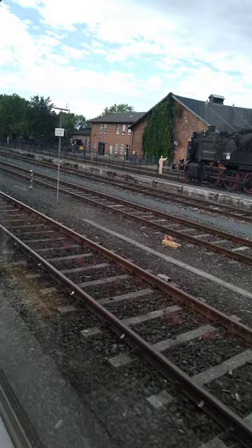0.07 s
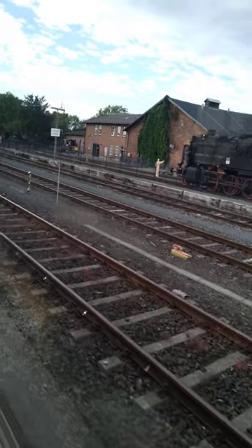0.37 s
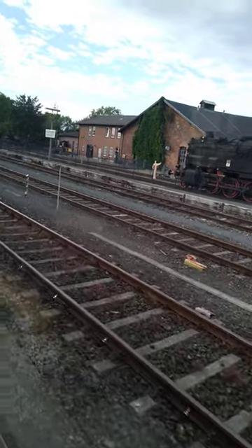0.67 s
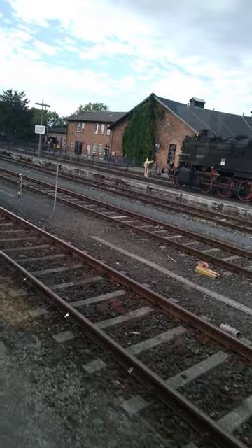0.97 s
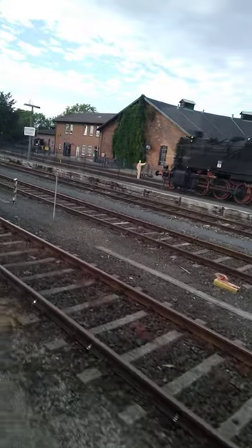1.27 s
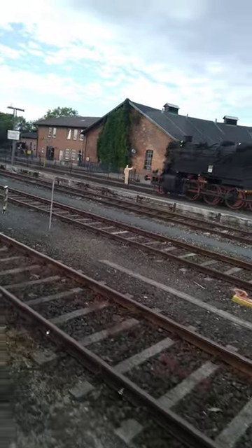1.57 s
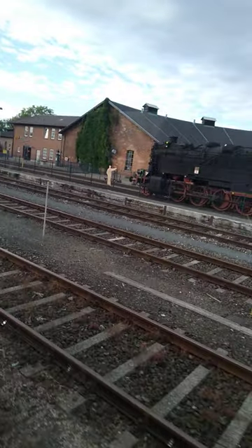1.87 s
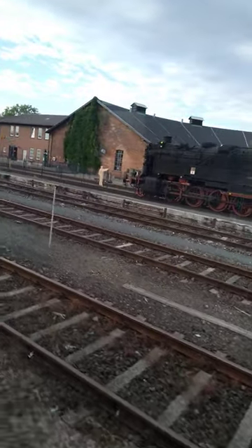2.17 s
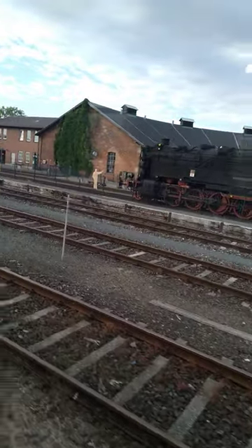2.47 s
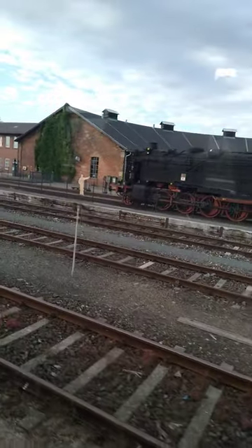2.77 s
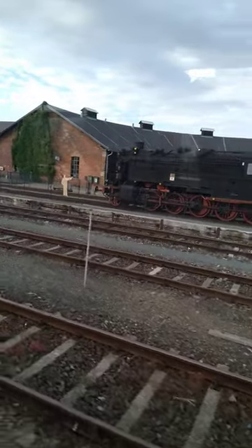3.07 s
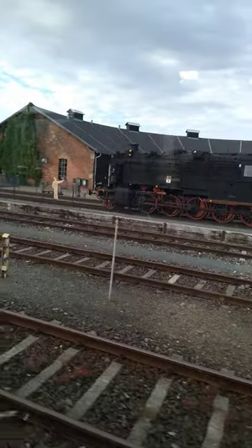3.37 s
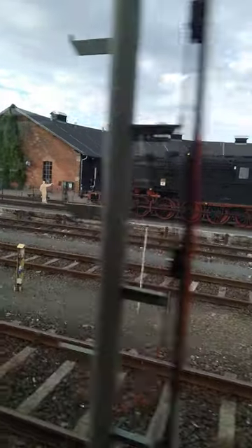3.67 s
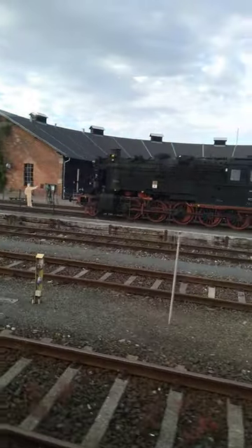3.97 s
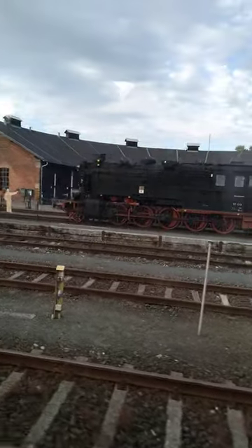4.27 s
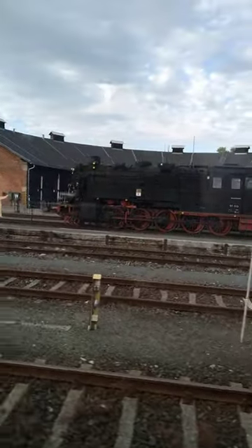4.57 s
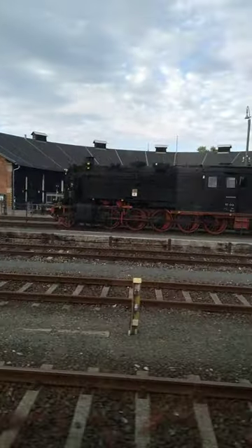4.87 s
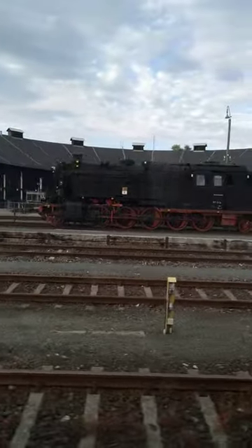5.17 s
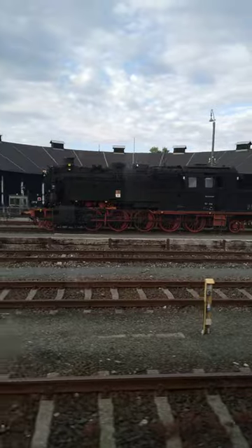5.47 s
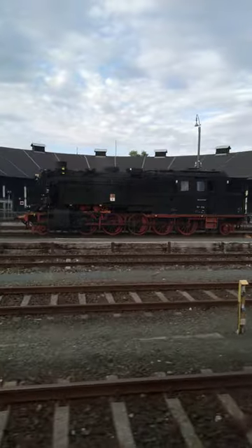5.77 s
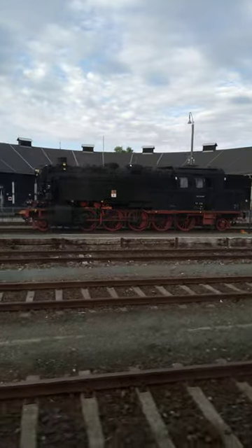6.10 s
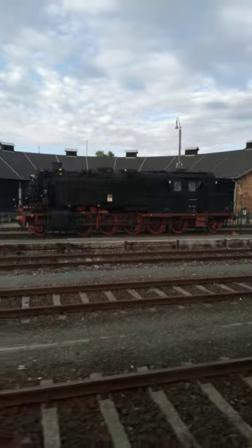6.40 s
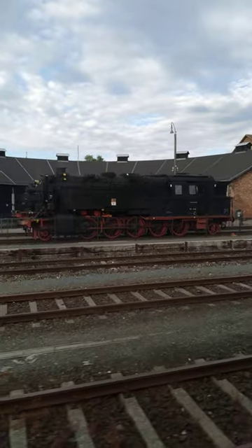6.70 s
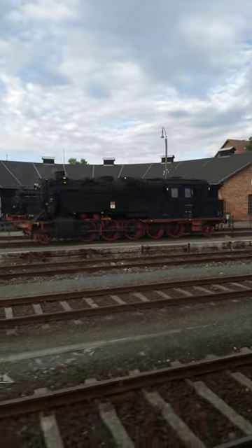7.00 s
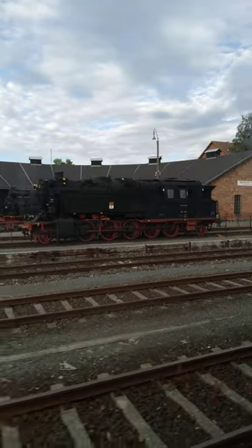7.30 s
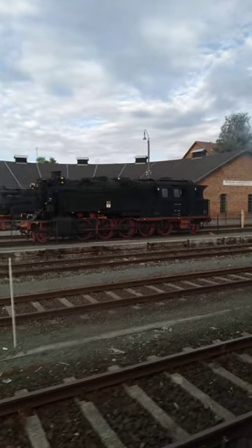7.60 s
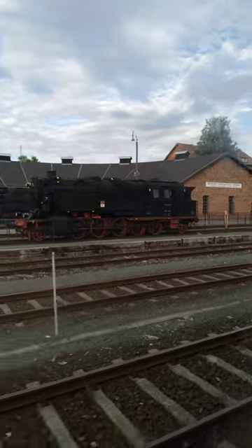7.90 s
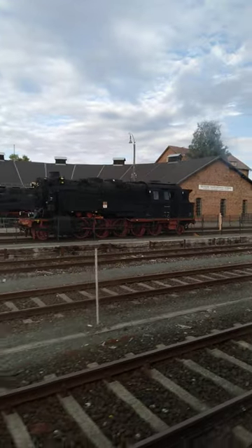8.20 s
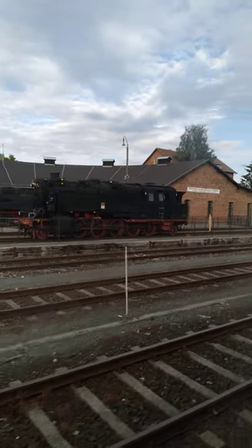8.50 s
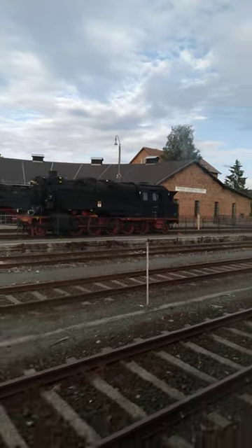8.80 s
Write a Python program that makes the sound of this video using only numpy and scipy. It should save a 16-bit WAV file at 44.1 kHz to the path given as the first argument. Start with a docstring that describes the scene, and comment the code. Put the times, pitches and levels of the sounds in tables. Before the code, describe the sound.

Inside a rolling train, wheels rumble under a diesel engine's drone, with gusts of window air and two sharp microphone bumps.

```python
"""A six-cylinder diesel drones through the cabin of a railcar rolling through a yard, heard from inside.
It drops in a gear change with a puff of air, then pulls again, while the wheels rumble and roar.
On the right a draught hisses in gusts at a window gap. Closest of all is the hand on the microphone,
which bumps it twice and clicks on its grip.
The sound opens from silence with a faint crackle and a short fade."""
import sys
import numpy as np
from scipy.fft import rfft, irfft, next_fast_len
from scipy.io import wavfile
from scipy.ndimage import map_coordinates

SR = 44100
rng = np.random.default_rng(int(sys.argv[2]) if len(sys.argv) > 2 else 0)


def int16_out(signal):
    """Quantize to a 16-bit WAV file."""
    q = np.round(np.clip(np.atleast_2d(signal).T, -1, 1) * 32767)
    wavfile.write(sys.argv[1], SR, q.astype(np.int16))


N = 390285


def engine(firing, cycle, firing_hz, shift_s=1.57, engage_s=2.0, shift_len_s=0.42,
           waver_db=1.9, swell_db=1.45, flicker_db=0.65, drift_rad=0.24):
    """Six firings a cycle; the cabin swells four orders as the speed takes them through its resonances."""
    boom = [(0.9, -48), (1.15, -35), (1.62, -25.5), (1.88, -47), (2.15, -26.5), (2.75, -26), (3.5, -24),
            (5.4, -28.5), (5.95, -25), (6.3, -33.5), (6.9, -25), (7.55, -34), (8.25, -24.5), (8.85, -26)]  # tone at the firing rate: t/s, level/dB
    orders = [2, 2.5, 3, 6]  # tones the cabin lifts: multiples of the firing rate
    order_levels = [(-40.5, -45.5), (-39, -49), (-48.5, -42.5), (-63.5, -55.5)]  # each, off resonance: low-gear level/dB, high-gear level/dB
    surges = [(0.62, 0.23, 7), (1.49, 0.34, 8), (1.83, .2, 6.5), (2.55, 0.26, 12.5), (7.15, 0.63, 3)]  # the second order under a changing load: t/s, length/s, lift/dB
    # hums at four and seven times the firing rate: t/s, level/dB
    low_hum = [(1.0, -49), (1.7, -58), (2.3, -47.5), (4.05, -43), (4.5, -31.5), (5.4, -42), (5.65, -38.5),
               (6.5, -34), (6.9, -40.5), (8.0, -37), (8.85, -42)]
    high_hum = [(2.0, -64), (2.301, -47), (3.3, -44), (4.4, -39.5), (5.1, -42), (5.4, -53.5), (5.65, -41),
                (6.3, -40.5), (6.95, -34.5), (7.55, -49), (8.85, -45.5)]
    # further engine tones: multiple of the cycle rate, level/dB
    low_gear = [(3, -31), (10, -39), (26, -39), (28, -39), (50, -69)]
    high_gear = [(4, -50), (21, -49.5), (33, -56), (39, -53), (45, -53.5), (51, -54.5), (66, -65),
                 (72, -62.5)]
    t = np.arange(N) / SR
    drone = amp(curves(boom)[0] + flicker_db * wobble(9.7)) * np.sin(firing)
    engaged = np.clip((t - engage_s) / shift_len_s + .5, 0, 1)
    surge_db = sum(db * swell(s, length_s, 2) for s, length_s, db in surges)
    for k, (low_db, high_db) in zip(orders, order_levels):
        db = low_db + engaged * (high_db - low_db) + cabin_db(k * firing_hz) + (k == 2) * surge_db
        level = amp(db + swell_db * wobble(4) + flicker_db * wobble(14))
        drone += level * np.sin(k * firing + rng.uniform(0, 2 * np.pi))
    for k, hum in (4, low_hum), (7, high_hum):
        level = amp(curves(hum)[0] + flicker_db * wobble(14))
        drone += level * np.sin(k * firing + rng.uniform(0, 2 * np.pi))
    shifted = np.clip((t - shift_s) / shift_len_s / 2 + .5, 0, 1)
    for lines, share in (low_gear, 1 - shifted), (high_gear, shifted):
        for k, db in lines:
            phase = k * cycle + drift_rad * wobble(7) + rng.uniform(0, 2 * np.pi)
            drone += share * amp(db + waver_db * wobble(3)) * np.sin(phase)
    return drone * amp([[.3], [-.3]])


def cabin_db(hz):
    """How much the cabin's standing waves lift a tone at the microphone."""
    standing_waves = [(91.46, 3, 9), (111.5, 8, 10.5), (127.7, 4, 6), (131.7, 1.5, 7), (139.3, 3, 6),
                      (262.5, 4.5, 15.5)]  # f/Hz, width/Hz, lift/dB
    return sum(db / (1 + (2 * (hz - centre) / width) ** 2) for centre, width, db in standing_waves)


def clatter(cycle, firing_hz, slowest_db=-54, db_per_decade=50, looseness=.5, size=1024):
    """The engine block rings with a pattern that repeats every crank turn, louder at high revs."""
    block_modes = [(279, 51, 13.5), (555.6, 50, 5), (782, 97, 1.5), (1022, 144, -0.5), (1278, 66, -2.5),
                   (2078, 49, -5.5), (2800, 39, -19)]  # f/Hz, width/Hz, level/dB
    crank = cycle / np.pi % 1 * size  # two turns a cycle
    pattern = np.array([np.interp(crank, np.arange(size), row) for row in rng.standard_normal((2, size))])
    shake = pattern + looseness * rng.standard_normal((2, N))
    ring = filtered(shake, lambda f: resonances(block_modes, f) / (1 + (f / 2500) ** 6))
    return amp(slowest_db + db_per_decade * np.log10(firing_hz / firing_hz.min())) * unit(ring)


def growl(firing, throb=0.34):
    """Loose gears chatter in their casing in step with the firings, at high revs and on load changes."""
    levels = [(0.5, -41.5), (1.3, -46), (1.6, -49), (1.88, -42), (2.05, -54), (2.3, -61), (5.05, -61.5),
              (5.28, -39.5), (5.5, -49), (5.8, -55)]  # t/s, level/dB
    casing_modes = [(246, 53, -6), (293, 56, 0.5), (325, 20, 0.5), (374.5, 12, -13.5), (553, 22, -16.5)]  # f/Hz, width/Hz, level/dB

    def casing(f):
        low_cut = 1 - np.exp(-(f / 200) ** 4)
        return resonances(casing_modes, f) / (1 + (f / 600) ** 4) * low_cut

    chatter = (1 + throb * np.cos(firing)) * rng.standard_normal(N)
    return amp(curves(levels)[0]) * unit(filtered(chatter, casing))


def wheels(firing, throb=0.11, roar_db=-53, rumble_sway_db=0.76, roar_sway_db=1.1):
    """The floor rumbles underfoot, throbbing with the firings; steel on rail roars above it in pitch."""
    floor = [(0.5, -37), (1.1, -33), (1.5, -33), (3.4, -33), (4.5, -33), (8.85, -33)]  # the rumble builds, then holds: t/s, level/dB
    rough_patch = (5.1, 0.32, 2.7)  # a stretch of rough track: t/s, length/s, lift/dB
    # spectra of floor and rail: f/Hz, level/dB
    rumble_spectrum = [(10, -21.5), (28, 3.5), (55, 6.5), (80, 3), (115, 1.5), (155, -4.5), (220, -5),
                       (290, -8), (350, -10), (430, -24), (600, -27.5), (1200, -75.5)]
    roar_spectrum = [(150, -16), (400, -3.5), (520, -2), (680, -6), (830, -4.5), (1000, -16), (1450, -13),
                     (2000, -30), (2800, -34.5), (6000, -59.5), (12000, -76.5)]
    roar_balance = [(300, -7), (600, -7), (1000, 1), (2500, -4.5)]  # mostly to the right: f/Hz, left minus right/dB
    s, length_s, lift_db = rough_patch
    rough_db = lift_db * swell(s, length_s, 2.3)
    rumble_level = amp(curves(floor)[0] + rough_db + rumble_sway_db * wobble(16))
    rumble = rumble_level * noise(rumble_spectrum, balance=[(100, 0.88)])
    roar_level = amp(roar_db + rough_db + roar_sway_db * wobble(30) + 0.3 * wobble(4.9))
    roar = roar_level * walls(noise(roar_spectrum, roar_balance))
    return (1 + throb * np.cos(firing)) * rumble + roar


def draught(flutter_db=0.92, sway_db=0.3, dropout_db=-19, faint_below_db=-64, choppy_db=5):
    """Air rushes past the right window and hisses in its gap in gusts; when faint, it sounds choppy."""
    levels = [(0.5, -65, -81), (0.75, -63.5, -78), (0.92, -64.5, -80), (1.2, -60, -71.5), (2.1, -63, -69.5),
              (2.95, -63.5, -73.5), (3.65, -63, -71.5), (4.0, -65, -78.5), (4.6, -62, -72),
              (5.3, -63.5, -75.5), (5.8, -63.5, -75), (6.9, -73, -91), (7.5, -68.5, -84.5),
              (8.3, -64.5, -82.5), (8.85, -63, -81.5)]  # under the gusts: t/s, rush level/dB, hiss level/dB
    gusts = [(0.595, 0.048, 2, 1), (1.605, .27, 10, 7.5), (1.801, 0.12, 0.5, 6.5), (2.72, .12, 2.5, 4),
             (3.162, 0.26, 6.5, 8.5), (3.516, 0.31, 6, 12.5), (4.475, 0.12, 3.5, 7.5), (4.686, .1, 0.5, 4),
             (5.635, 0.12, 2.5, 6), (5.866, 0.036, 4.5, 8.5), (6.335, 0.3, 2, 4), (6.603, 0.086, 6.5, 10),
             (7.19, 0.11, 6.5, 9.5), (7.9, 0.19, 3.5, 7.5), (8.4, 0.066, 1.5, 10.5)]  # t/s, length/s, rush lift/dB, hiss lift/dB
    dropouts = [(3.864, 0.044), (4.088, 0.026), (4.227, 0.14), (5.947, .025), (6.01, 0.09), (6.236, 0.018),
                (6.448, 0.022), (6.512, .035), (6.798, .035), (6.958, .03), (7.103, 0.015), (7.294, 0.1),
                (7.441, 0.098), (7.57, 0.065), (8.022, 0.032), (8.171, 0.028)]  # rush and hiss cut out briefly: t/s, length/s
    # spectra of the passing air and the gap: f/Hz, level/dB
    rush_spectrum = [(500, -12), (1100, 8), (1600, 7), (2100, 5.5), (2800, 2.5), (3600, -2), (4800, -9),
                     (6500, -20), (10000, -41.5), (15000, -60)]
    hiss_spectrum = [(2000, -27), (4000, 4), (5500, 0), (7000, -3.5), (8500, -5.5), (9400, -3),
                     (10100, -2.5), (10800, -10), (12000, -18.5), (15500, -28.5)]
    window_balance = [(1000, 0.5), (2300, -7), (4400, -11), (7000, -15.5), (10000, -25.5), (15000, -26.5)]  # f/Hz, left minus right/dB
    rush_db, hiss_db = curves(levels)
    for s, length_s, rush_lift_db, hiss_lift_db in gusts:
        gust = swell(s, length_s, edge=3.7)
        rush_db += rush_lift_db * gust
        hiss_db += hiss_lift_db * gust
    faint = np.clip((faint_below_db - rush_db) / 8, 0, 1)
    cut_out = np.max([swell(s, length_s, edge=2.5) for s, length_s in dropouts], axis=0)
    unsteady_db = dropout_db * cut_out + sway_db * wobble(14) + flutter_db * wobble(60)
    unsteady_db += choppy_db * faint * np.tanh(4 * wobble(36))
    rush = amp(rush_db + unsteady_db) * walls(noise(rush_spectrum, window_balance))
    hiss = amp(hiss_db + unsteady_db + 0.45 * wobble(120)) * walls(noise(hiss_spectrum, window_balance))
    return rush + hiss


def bumps(t60=0.048, rise_s=.00033, size=4096):
    """A finger strikes the microphone's left port: a steep push of air and a damped rebound."""
    strikes = [(4.973, -11, 124.3), (5.023, -8.5, 139.1)]  # t/s, level/dB, f/Hz
    out = np.zeros((2, N))
    t = np.arange(size) / SR
    attack = 1 - np.exp(-(t / rise_s) ** 2)
    for s, db, hz in strikes:
        push = attack * np.cos(2 * np.pi * hz * (t - rise_s)) * amp(db - 60 * t / t60)
        add(out, s, np.outer([1, 0], push))
    return out


def grip_clicks():
    """The hand clicks on the grip, right at the microphone and mostly left: a thud with a snap."""
    clicks = [(4.284, -37.5, -24, 12), (5.08, -42, -3, 8), (5.499, -50, 4, 2), (6.192, -39, -19, 8),
              (6.454, -37.5, -28, 2), (6.876, -40, -31, 7), (7.01, -38, -28, 3), (7.353, -38.5, -36, 1),
              (7.499, -38.5, -22, 5.5), (7.668, -37.5, -23, 8), (7.885, -40, -1.5, 16)]  # t/s, level/dB, snap against thud/dB, left minus right/dB
    # spectra of the dull and the bright part: f/Hz, level/dB
    thud_spectrum = [(30, -8), (200, 13.5), (1000, 5.5), (1700, -1), (2500, -14.5), (4000, -31),
                     (8000, -62.5)]
    snap_spectrum = [(200, -12.5), (700, -5.5), (1500, 8.5), (2600, 2.5), (4300, -8.5), (6000, -31.5),
                     (9000, -43.5), (15000, -62.5)]
    out = np.zeros((2, N))
    for s, db, snap_db, pan_db in clicks:
        thud = blow(thud_spectrum, t60=0.037, ring_db=4.5)
        snap = amp(snap_db) * blow(snap_spectrum, t60=0.022, ring_db=-3.5)
        add(out, s, amp(db) * (thud + snap) * amp([[pan_db / 2], [-pan_db / 2]]))
    return out


def valve():
    """Compressed air puffs through an exhaust port in the gear change, a little to the right."""
    levels = [(1.36, -79), (1.46, -51.5), (1.58, -54), (1.7, -51.5), (1.83, -76)]  # t/s, level/dB
    port_modes = [(890, 51, 11), (1210, 340, 6), (1780, 80, 1.5), (1950, 66, -3), (2240, 120, -9),
                  (2650, 350, 0.5), (3580, 160, -11.5)]  # f/Hz, width/Hz, level/dB
    air = rng.standard_normal((2, N))
    puff = filtered(air, lambda f: resonances(port_modes, f) / (1 + (f / 5000) ** 4))
    return amp(curves(levels)[0]) * unit(puff) * amp([[-2], [2]])


def panel_buzz(cycle, hz=820, width_hz=45):
    """A cabin panel is shaken into ringing once every engine cycle."""
    levels = [(3.1, -80), (3.5, -62), (4.5, -56.5), (5.4, -62.5), (6, -61), (6.5, -84)]  # t/s, level/dB
    shake = np.exp(2.1 * np.cos(cycle)) * rng.standard_normal((2, N))
    ring = filtered(shake, lambda f: resonances([(hz, width_hz, 0)], f) ** 2)
    return amp(curves(levels)[0]) * unit(ring)


def whine(hz=835):
    """A thin, wavering whine comes and goes in the centre after the gear change."""
    levels = [(2.2, -77), (2.55, -64), (2.8, -55.5), (3.05, -59.5), (3.2, -74)]  # t/s, level/dB
    t = np.arange(N) / SR
    return amp(curves(levels)[0]) * np.sin(2 * np.pi * hz * t + .5 * wobble(25))


def window_ticks(left_db=-14):
    """The window ticks faintly, off to the right of the microphone."""
    ticks = [(0.7362, -58), (1.7886, -69), (4.4794, -59.5), (5.1397, -58), (5.6174, -67), (5.8644, -63),
             (8.382, -62)]  # t/s, level/dB
    tick_spectrum = [(1000, -26), (4000, -0.5), (7500, 4.5), (10500, -5.5), (15000, -10)]  # f/Hz, level/dB
    out = np.zeros((2, N))
    for s, db in ticks:
        tick = blow(tick_spectrum, t60=.045, ring_db=14)
        add(out, s, amp(db) * tick * amp([[left_db], [0]]))
    return out


def crackle():
    """A few dry one-sample clicks as the sound opens."""
    clicks = [(0.386, -39), (0.396, -30), (0.4065, -37), (0.4267, -32)]  # t/s, level before the fade/dB
    out = np.zeros(N)
    for s, db in clicks:
        out[round(s * SR)] = amp(db)
    return out


def walls(x):
    """Early echoes off walls and glass near the microphone ripple the spectrum."""
    echoes = [(.0027, .17), (.0044, .16), (.0069, .15), (.0103, .15)]  # delay/s, share of the amplitude
    return x + sum(share * np.pad(x, ((0, 0), (round(s * SR), 0)))[:, :N] for s, share in echoes)


def noise(spectrum, balance):
    """Coloured stereo noise whose mid has rms 1: alike in the bass, diffuse above."""
    likeness = [(50, 0.91), (130, 0.89), (280, 0.34), (500, 0.36), (900, -0.29), (2000, -0.031),
                (5000, 0.073)]  # of the microphone's two sides: f/Hz, correlation

    def mid_and_side(hz):
        angle = np.arccos(np.clip(along(likeness, hz), -1, 1)) / 2
        return amp(along(spectrum, hz)) * [np.cos(angle), np.sin(angle)]

    mid, side = filtered(rng.standard_normal((2, N)), mid_and_side)
    pair = np.array([mid + side, mid - side])
    pair = filtered(pair, lambda hz: amp(np.outer([.5, -.5], along(balance, hz))))
    return pair / np.std(pair.mean(axis=0))


def blow(spectrum, t60, ring_db, size=4096):
    """A stereo impact: a sharp push of peak 1 and a short diffuse ring of the same colour."""
    cepstrum = irfft(np.log(amp(along(spectrum, np.fft.rfftfreq(size, 1 / SR)))))
    cepstrum[1:size // 2] *= 2  # minimum phase: nothing sounds ahead of the hit
    cepstrum[size // 2:] = 0
    colour = np.exp(rfft(cepstrum))
    ring = rng.standard_normal((2, size)) * amp(-60 * np.arange(size) / SR / t60)
    ring *= amp(ring_db) / np.linalg.norm(ring[0])
    return irfft(colour * (1 + rfft(ring))) / np.max(irfft(colour))


def resonances(modes, f):
    """The causal response at frequencies f of a few modes of alternating sign."""
    return sum((-1) ** k * amp(db) * 1j * f * width / (centre ** 2 - f ** 2 + 1j * f * width)
               for k, (centre, width, db) in enumerate(modes))


def filtered(x, response):
    """x through a response given as a function of frequency."""
    size = next_fast_len(N + 8192)
    return irfft(rfft(x, size) * response(np.fft.rfftfreq(size, 1 / SR)), size)[..., :N]


def wobble(rate):
    """A smooth random curve, rate knots a second."""
    t = np.arange(N) / SR
    coarse = t[::64]
    knots = rng.standard_normal(size=1024)
    return np.interp(t, coarse, map_coordinates(knots, [coarse * rate], mode="mirror"))


def swell(s, length_s, edge):
    """A rise and fall of height 1 around time s; edge 2 is a bell, more is flatter with steeper flanks."""
    return np.exp(-np.abs(2 * (np.arange(N) / SR - s) / length_s) ** edge)


def curves(rows):
    """One value per sample for each column after the time."""
    s, *columns = np.transpose(rows)
    return [np.interp(np.arange(N) / SR, s, column) for column in columns]


def along(points, hz):
    """Interpolate (f/Hz, value) points on a log axis."""
    f, values = np.transpose(points)
    return np.interp(np.log(hz + 1), np.log(f + 1), values)


def add(track, s, sound):
    """Mix a sound in at time s."""
    part = track[:, round(s * SR):][:, :sound.shape[1]]
    part += sound[:, :part.shape[1]]


def amp(db):
    """Decibels as amplitude."""
    return 10 ** (np.asarray(db) / 20)


def unit(x):
    """x at rms 1."""
    return x / np.sqrt(np.mean(x ** 2) + 1e-20)


def scene():
    """Engine, wheels, air and handling, as they reach a hand-held microphone in the cabin."""
    engine_speed = [(0.4, 66.19), (1.15, 66.56), (1.55, 64.4), (1.72, 58.73), (1.88, 54.19), (2.15, 41.48),
                    (2.8, 42.75), (3.25, 43.47), (4.2, 43.9), (4.95, 44.24), (5.2, 45.55), (5.4, 48.47),
                    (5.72, 43.47), (6.0, 43.52), (6.75, 44.92), (7.1, 45.4), (7.5, 46.33), (8.85, 45.94)]  # steady, dropping, pulling again with one flare: t/s, firing f/Hz
    firing_hz, = curves(engine_speed)
    firing = 2 * np.pi * np.cumsum(firing_hz) / SR
    cycle = firing / 6  # phase of the four-stroke cycle
    drive = engine(firing, cycle, firing_hz) + clatter(cycle, firing_hz) + growl(firing)
    railcar = drive + panel_buzz(cycle) + whine() + wheels(firing) + valve()
    return railcar + draught() + grip_clicks() + window_ticks() + bumps() + crackle()


def record(dry, open_s=0.385, ramp_s=.008, fade_db=-19, fade_s=0.1, self_noise_db=-90, top_hz=15750):
    """The microphone opens late and fades in, adds its own faint hiss, closes softly and is band-limited."""
    t = np.arange(N) / SR
    opened = np.clip(np.minimum(t - open_s, t[-1] - t) / ramp_s, 0, 1)
    fade = amp(fade_db * np.exp(-np.maximum(t - open_s, 0) / fade_s))
    heard = (fade * dry + amp(self_noise_db) * rng.standard_normal((2, N))) * opened
    return filtered(heard, lambda hz: hz < top_hz)


dry = scene()
out = record(dry)
int16_out(out)
```